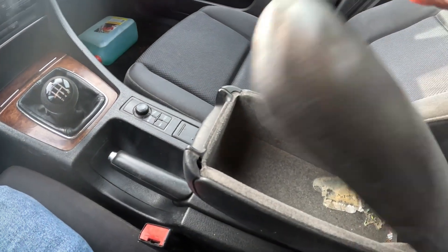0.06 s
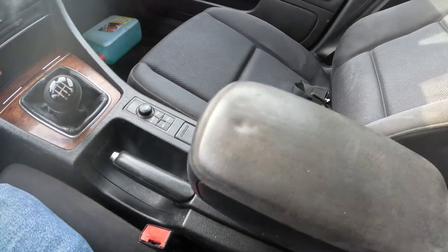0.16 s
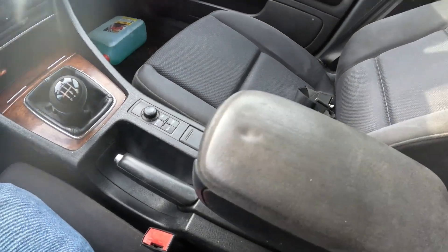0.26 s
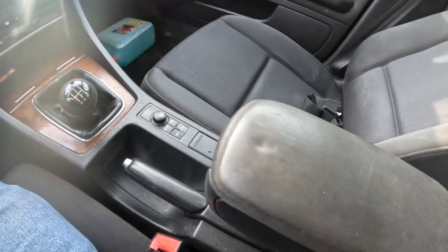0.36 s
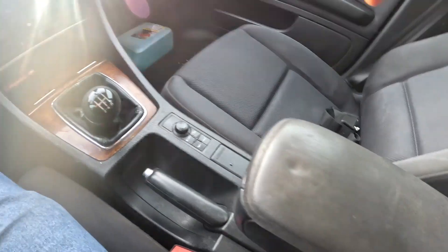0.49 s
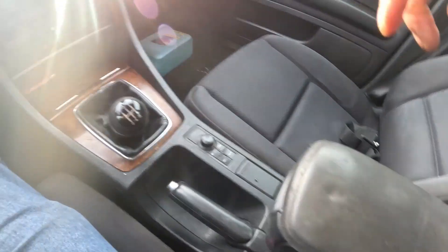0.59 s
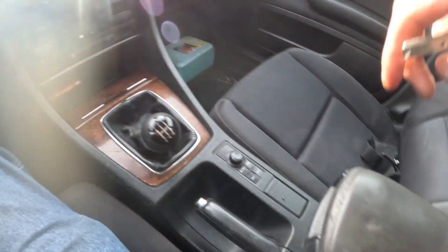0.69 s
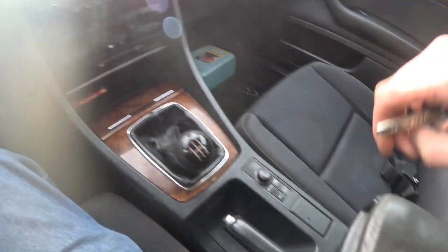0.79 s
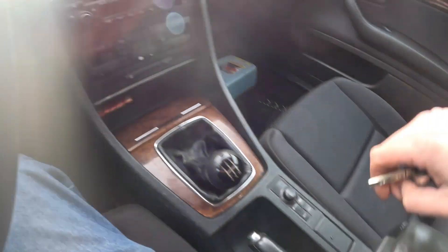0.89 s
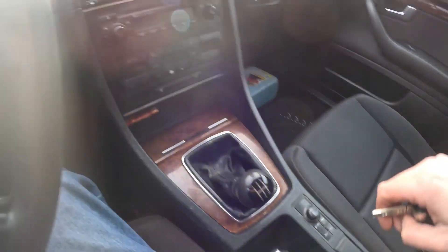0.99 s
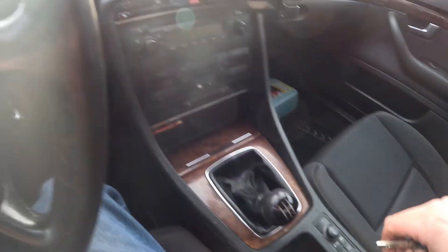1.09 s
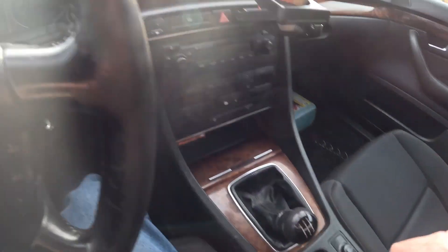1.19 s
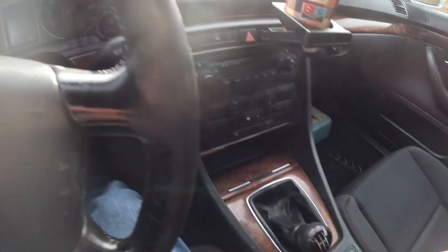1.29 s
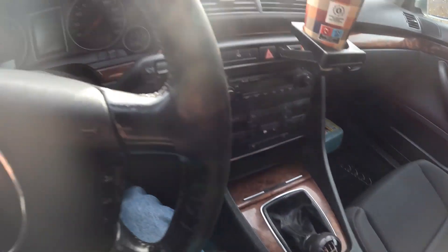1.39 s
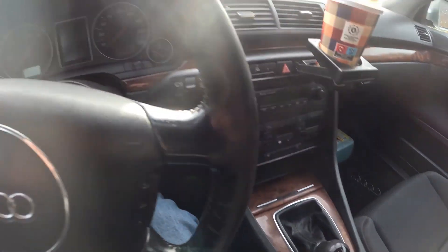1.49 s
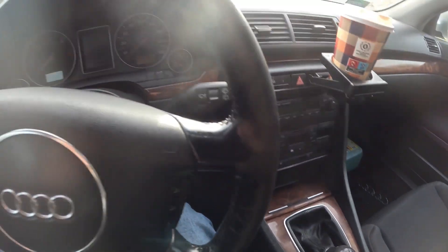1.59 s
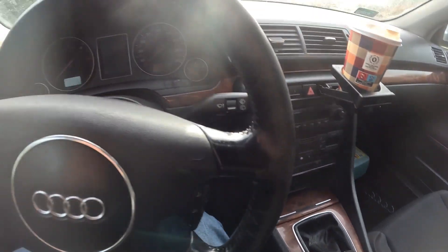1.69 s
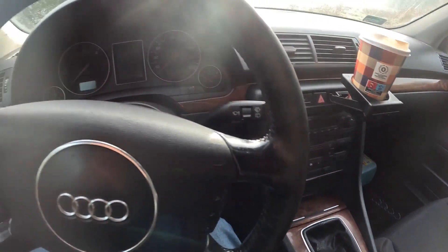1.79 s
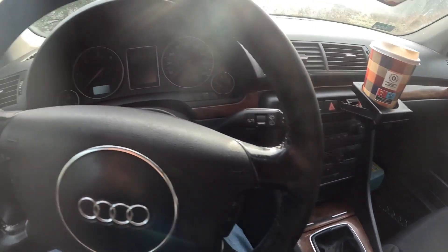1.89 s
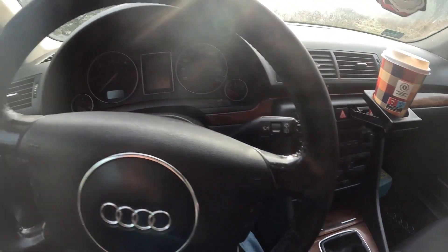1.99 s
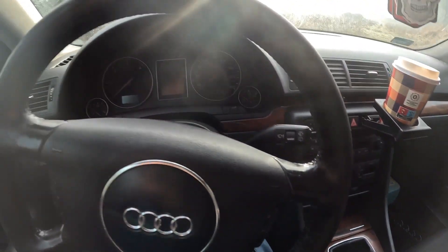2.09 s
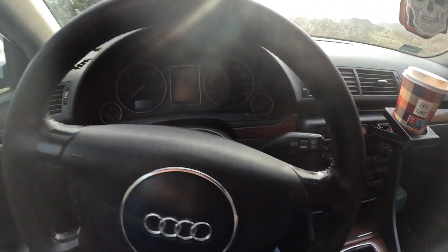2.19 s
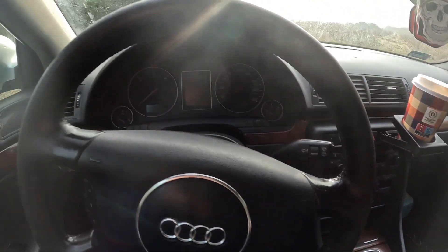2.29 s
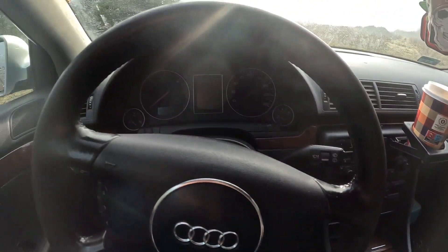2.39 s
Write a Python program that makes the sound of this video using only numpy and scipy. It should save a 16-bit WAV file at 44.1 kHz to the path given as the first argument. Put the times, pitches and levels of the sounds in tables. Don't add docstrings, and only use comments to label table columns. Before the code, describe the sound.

A padded armrest lid bangs shut inside a parked car, with a brief hinge squeak, loose contents rattling and two small bounces; later, soft cloth rustle and metallic key clicks, heard close on a hand-held phone in a dry cabin.

```python
import sys
import numpy as np
from scipy import signal
from scipy.fft import rfft, irfft
from scipy.io import wavfile
from scipy.ndimage import uniform_filter1d

SR = 44100
rng = np.random.default_rng(int(sys.argv[2]) if len(sys.argv) > 2 else 0)


def put_to_file(sound):
    columns = np.atleast_2d(sound).T
    safe = np.clip(columns, -1, 1)
    whole_steps = np.round(safe * 32767)
    wavfile.write(sys.argv[1], SR, whole_steps.astype(np.int16))


def linear_from_db(decibels):
    return 10 ** (np.asarray(decibels, float) / 20)


N = 105840

# (time [s], level [dB], contact [ms], box level [dB], boom level [dB])
LID_CONTACTS = [(0.166, -43, 1.4, -7, -4.5), (0.181, -35.5, 1.3, -7.5, -8.5), (0.1872, -28.5, 1.1, -3, 5.5),
                (0.1965, -16.5, 2.6, -4, 2), (0.2, -23.5, 1.6, -3, 0.5), (0.2041, -19, 1.4, -2, -7),
                (0.2062, -20.5, .9, -4, -7), (0.2096, -2.5, 0.33, -8, -8.5), (0.2124, -22, 0.25, 4, -10.5),
                (0.25, -36, 1.82, 0.5, 7.5), (0.262, -40, 1.5, 4, 1.5), (0.2899, -22.5, 0.6, 2.5, 2),
                (0.299, -33.5, .8, 4.5, 4), (0.331, -31, 1.4, 8, 9.5), (.345, -42, 1, 6, 13.5),
                (0.399, -47, 3.6, -29, 14)]
# (freq [Hz], level [dB], t60 [s])
SHELL_MODES = [(662.5, -7.5, 0.013), (849, -3.5, 0.023), (1050, -3, 0.016), (1589, -9, 0.017),
               (1755, -25, 0.067), (2980, 3, 0.0053), (3500, -6.5, 0.012)]
# (freq [Hz], level [dB], t60 [s])
PAD_MODES = [(216, 1.5, .06)]
# (freq [Hz], level [dB], t60 [s])
BOX_MODES = [(241, -4, 0.078), (288.8, -2.5, 0.044), (330, -7.5, 0.019), (390.9, -13.5, 0.062),
             (670, -14, 0.029), (785, -8, 0.019), (900, -12.5, 0.022), (1497, -9, 0.04)]
# (freq [Hz], level [dB], t60 [s])
BOOM_MODES = [(36.8, -14.5, 0.11), (50, -16.5, 0.42), (62.66, -14, .14), (73, -16.5, 0.16),
              (98.34, -26, 0.29), (166, -21.5, .08)]
# (time [s], level [dB], brightness [Hz], t60 [s])
CRACKS = [(0.167, -54, 2530, 0.11), (0.182, -42, 3200, 0.11), (.188, -40.5, 1500, 0.056),
          (0.1983, -31, 2800, 0.054), (.2025, -39, 4464, .03), (0.2094, -10, 8970, 0.018),
          (0.2131, -28.5, 4960, 0.051), (.22, -36.5, 3523, .05), (0.236, -46.5, 4190, 0.028),
          (0.2607, -50, 2507, 0.052), (0.2899, -31.5, 6700, 0.0244), (.298, -45, 5500, 0.029),
          (.311, -50, 3430, 0.081), (0.3324, -40.5, 3360, .035), (0.3459, -45, 4995, 0.028)]
# (freq [Hz], density [dB per Hz])
CRACK_SPECTRUM = [(350, -38), (600, -12), (966, -6.5), (2220, -19.5), (3980, -20.5), (10200, -27),
                  (15500, -61.5)]
# (time [s], level [dB], t60 [s])
JUMPS = [
    (.185, -39, 0.19),
    (.2, -32, .06),
    (.212, -23, .07),
    (.24, -39, 0.07),
    (.259, -45.5, .1),
    (.275, -51.5, .06),
    (.292, -33, 0.077),
    (.312, -38, 0.091),
    (.333, -37, 0.077),
    (.348, -46.5, 0.041),
]
# (freq [Hz], width [Hz], level [dB])
CONTENTS = [(443, 50, 0), (620, 37, -1.5), (784, 76, -3.5), (932.6, 100, -4.5), (1132, 64, -7),
            (1430, 89, -14.5), (1830, 120, -16)]
# (time [s], level [dB], t60 [s])
SHUDDERS = [
    (.188, -30, .15),
    (.26, -36, 0.22),
    (.325, -30, 0.26),
    (.395, -41, 0.16),
]
# (time [s], level [dB], body relative level [dB], brightness [Hz])
TICKS = [(0.0177, -58.5, -0.5, 5430), (0.1078, -48, -7, 2500), (0.7743, -58, 2.5, 5300),
         (1.038, -58.5, 3.5, 3660), (1.0686, -48, -6.5, 7580), (1.0938, -52, -0.5, 6140),
         (1.1733, -54.5, -3, 3430), (1.2732, -35.5, -13.5, 4320), (1.2883, -39.5, -5, 3680),
         (1.3122, -35, -5.5, 3370), (1.3352, -41.5, -2, 3380), (1.3525, -39, -5.5, 3380),
         (1.3729, -39, -3, 3680), (1.4001, -38.5, -4.5, 3640), (1.5136, -37, -9, 3780),
         (1.662, -49.5, -8.5, 3640), (1.898, -51.5, -11.5, 9800), (1.8985, -57.5, -11.5, 3200),
         (0.05, -55.5, -19, 4500), (1.9684, -56, -15, 3825), (2.2627, -36, -19, 5900)]
# (freq [Hz], width [Hz], level [dB])
LOCK = [(2550, 220, -13), (3315, 150, 4), (3680, 140, 4), (4780, 580, -4), (5490, 390, -4.5),
        (6380, 210, -7), (7040, 130, 2), (8840, 420, -21.5)]
# (freq [Hz], width [Hz], level [dB])
HOUSING = [(449, 38, 6), (736, 160, 7), (1050, 62, 1), (1290, 100, 5), (1650, 33, -46)]
# (time [s], length [s], level [dB], pitch [Hz])
CREAKS = [(.03, 0.047, -54, 520), (.08, 0.0089, -56.5, 426), (0.259, 0.015, -35.5, 420),
          (0.291, .01, -35, 770), (0.2899, .008, -36.5, 990), (1.723, 0.027, -56, 232),
          (1.31, 0.018, -52, 240), (1.275, 0.022, -54.5, 424), (1.314, 0.0091, -50.5, 1240),
          (1.36, 0.044, -70, 430), (1.614, 0.015, -56, 1360), (1.612, 0.014, -59.5, 600),
          (1.63, 0.008, -61.5, 330), (1.663, 0.0087, -52.5, 900), (1.713, 0.015, -53, 1374),
          (1.714, 0.0096, -57, 436), (1.733, .014, -59, 900), (1.745, 0.0064, -58, 1497),
          (2.264, 0.0071, -47.5, 657.4), (2.267, 0.0095, -49.5, 1080)]
# (time [s], level [dB])
CLOTH_DB = [(0, -78.5), (.17, -62), (.3, -74), (.98, -70), (1.12, -68.5), (1.25, -61.5), (1.4, -62),
            (1.46, -67), (1.58, -71.5), (1.7, -63.5), (1.79, -63.5), (1.9, -65.5), (1.98, -74.5),
            (2.3, -77.5)]
# (freq [Hz], density [dB per Hz])
CLOTH_SPECTRUM = [(410, -47.5), (700, -15.5), (1230, 3), (2280, -3), (3520, -4), (3950, -5.5),
                  (7700, -10.5), (12200, -24.5), (15000, -41.5)]
# (time [s], level [dB])
SEAT_DB = [(0, -69), (.12, -66.5), (.4, -64.5), (.5, -103), (.72, -77), (.85, -65), (1.05, -64.5),
           (1.35, -73.5), (1.47, -69), (1.75, -76), (2.4, -82.5)]
# (freq [Hz], density [dB per Hz])
SEAT_SPECTRUM = [(76, -34.5), (130, -3.5), (205, -4.5), (391, -8.5), (900, -23), (1170, -55), (1980, -120)]
# (time [s], level [dB])
GRIP_DB = [(0, -58.5), (.15, -58.5), (.45, -54.5), (.53, -51), (.78, -62), (1.06, -53.5), (1.11, -59),
           (1.15, -46.5), (1.2, -59), (1.3, -48), (1.42, -56.5), (1.49, -76), (1.56, -54.5), (1.66, -60.5),
           (1.76, -51), (1.87, -58), (1.94, -60.5), (2.4, -58)]
# (freq [Hz], density [dB per Hz])
GRIP_SPECTRUM = [(7.1, -32), (12, 7.5), (49, 1.5), (81, -8), (200, -24.5), (260, -45.5), (440, -120)]
# (freq [Hz], density [dB per Hz])
HISS_SPECTRUM = [(88, -35), (150, -0.5), (500, -15.5), (656, -15), (844, -24.5), (1220, -9), (2100, -22),
                 (6110, -23.5), (15500, -29.5)]
# (freq [Hz], left lead [rad])
PORT_RAD = [(0, 0), (300, .1), (700, .3), (1200, -.3), (1900, -.9), (2500, -.4), (3900, -1.0), (4700, -.3),
            (16000, -1)]
# (freq [Hz], left minus right [dB])
PORT_DB = [(50, -1), (380, -1.1), (700, -2.5), (1300, -1.3), (2400, 1.5), (4400, 1.5), (8000, 3),
           (15000, .5)]

TIME_S = np.arange(N) / SR
SHORT_S = np.arange(4096) / SR
LEFT_RIGHT = np.array([[.5], [-.5]])


def colour(x, points):
    p = np.array(points)
    f = np.arange(x.shape[-1] // 2 + 1) * SR / x.shape[-1] + 1
    gain = linear_from_db(np.interp(np.log(f), np.log(p[:, 0]), p[:, 1]))
    y = irfft(rfft(x) * gain, x.shape[-1])
    return y / np.sqrt(np.mean(y ** 2))


def curve(points):
    p = np.array(points)
    return linear_from_db(np.interp(TIME_S, p[:, 0], p[:, 1]))


def walk(rate_hz):
    k = int(SR / rate_hz)
    w = uniform_filter1d(uniform_filter1d(rng.standard_normal(N), k), k)
    return w / w.std()


def fall(t, t60_s):
    return (t >= 0) * linear_from_db(-60 * np.maximum(t, 0) / t60_s)


def bursts(table):
    return sum(linear_from_db(db) * fall(TIME_S - s, t60_s) for s, db, t60_s in table)


def add(out, at_s, x):
    i = int(at_s * SR)
    out[i:i + len(x)] += x[:N - i]


def highpass(x, hz, order):
    return signal.lfilter(*signal.butter(order, hz, "high", fs=SR), x)


def ring(x, modes):
    y = 0
    for hz, db, t60_s in modes:
        pole = np.exp(2j * np.pi * hz / SR - np.log(1000) / (t60_s * SR))
        y = y + linear_from_db(db) * signal.lfilter([1], [1, -pole], x)
    return y


def peaks(x, table, trim_db=0):
    y = 0
    for (hz, width_hz, db), trim in zip(table, np.broadcast_to(trim_db, len(table))):
        y = y + linear_from_db(db + trim) * signal.lfilter(*signal.iirpeak(hz, hz / width_hz, SR), x)
    return y


def shove(t, ms):
    return np.sin(np.pi * np.clip(t * 1000 / ms, 0, 1)) ** 2 * 2000 / (ms * SR)


def lid_body():
    squash_lag_ms, squash_ms = 2.05, 1.1
    push, pad, box, boom = 0, 0, 0, 0
    for s, db, contact_ms, box_db, boom_db in LID_CONTACTS:
        squash = linear_from_db(db) * shove(TIME_S - s - squash_lag_ms / 1000, squash_ms)
        push = push + linear_from_db(db) * shove(TIME_S - s, contact_ms)
        pad = pad + squash
        box = box + linear_from_db(box_db) * squash
        boom = boom + linear_from_db(boom_db) * squash
    swing = ring(pad, PAD_MODES) + ring(box, BOX_MODES)
    lid = highpass(ring(push, SHELL_MODES).real + swing.imag, 170, 2)
    return lid + highpass(ring(boom, BOOM_MODES).imag, 28, 2)


def cracks():
    out, noise = np.zeros(N), colour(rng.standard_normal(N), CRACK_SPECTRUM)
    for s, db, hz, t60_s in CRACKS:
        attack = np.minimum(SHORT_S * 2000, 1)
        x = noise[int(s * SR):][:len(SHORT_S)] * fall(SHORT_S, t60_s) * attack
        add(out, s, linear_from_db(db) * signal.lfilter(*signal.butter(2, min(hz, 18000), fs=SR), x))
    return out


def rattle():
    knocks = rng.standard_normal(N) ** 2 * rng.standard_normal(N)
    return peaks(peaks(bursts(JUMPS) * knocks, CONTENTS), [(800, 530, 6.9)])


def shudder():
    mount = [(48.5, 48, 12)]
    return peaks(peaks(bursts(SHUDDERS) * rng.standard_normal(N), mount), mount)


def squeak():
    start_s, length_s, hz, level_db, rise_db = .186, .026, 7930, -27, 14.5
    u = np.clip((TIME_S - start_s) / length_s, 0, 1)
    tone = np.sin(2 * np.pi * hz * TIME_S + 0.68 * walk(900))
    window = np.sqrt(np.abs(np.sin(np.pi * u)))
    return tone * window * linear_from_db(2.0 * walk(400)) * linear_from_db(level_db + rise_db * (u - 2.5))


def ticks():
    hold_s, metal_t60_s, body_t60_s = 0.00032, 0.042, 0.0424
    metal_trim_db, body_trim_db, scatter_db = -9.5, -8.5, 2
    out, t = np.zeros(N), SHORT_S
    for s, db, body_db, hz in TICKS:
        noise, knock, spikes = rng.standard_normal((3, len(t)))
        envelope = fall(np.maximum(t - hold_s, 0), metal_t60_s) * np.minimum(t * 1000, 1)
        chatter = noise * linear_from_db(1.3 * np.abs(spikes)) * envelope
        near_db = [-3.0 * np.log2(f / hz) ** 2 + scatter_db * rng.standard_normal() for f, _, _ in LOCK]
        metal = peaks(chatter, LOCK, near_db) + peaks(chatter, [(hz, hz * 0.2, -9)])
        body_scatter_db = scatter_db * rng.standard_normal(len(HOUSING))
        body = peaks(knock * fall(t - .001, body_t60_s), HOUSING, body_scatter_db)
        add(out, s, linear_from_db(db + metal_trim_db) * metal / metal[:256].std())
        add(out, s, linear_from_db(db + body_db + body_trim_db) * body / body[:256].std())
    return out


def scrape():
    start_s, length_s, level_db, centre_hz = 1.72, .215, -62, 3120
    u = np.clip((TIME_S - start_s) / length_s, 0, 1)
    near_db = [-6.0 * np.log2(f / centre_hz) ** 2 for f, _, _ in LOCK]
    drag = peaks(rng.standard_normal(N) * linear_from_db(4.2 * walk(71)), LOCK, near_db)
    return linear_from_db(level_db) * drag / drag.std() * np.sqrt(np.abs(np.sin(np.pi * u ** 2)))


def creaks():
    out, t = np.zeros(N), SHORT_S
    for s, length_s, db, hz in CREAKS:
        jerks = linear_from_db(5.7 * np.abs(rng.standard_normal(len(t))))
        slip = rng.standard_normal(len(t)) * jerks * fall(np.maximum(t - length_s, 0), 0.038)
        x = peaks(slip, [(hz, hz * 0.18, 0), (hz * 2.4, hz * .5, -10)])
        x = peaks(x, [(hz, hz, 0)])
        add(out, s, linear_from_db(db - 6) * x / x[:int(length_s * SR)].std())
    return out


def rubbing():
    grains_per_s, grain_db = 400, 4.5
    chance, size = rng.random((2, N))
    grains = (chance < grains_per_s / SR) * linear_from_db(-grain_db * np.log(size + 1e-9)) * rng.standard_normal(N)
    cloth = colour(grains + 0.96 * rng.standard_normal(N), CLOTH_SPECTRUM)
    cloth = cloth * curve(CLOTH_DB) * linear_from_db(1.5 * walk(30))
    upholstery = colour(rng.standard_normal(N), SEAT_SPECTRUM)
    return cloth + upholstery * curve(SEAT_DB) * linear_from_db(0.87 * walk(18))


def cabin(x):
    t60_s, level_db, low_hz, spread_db, spread_hz = 0.06, -7, 515.2, 1, 900
    t = np.arange(8192) / SR
    noise = rng.standard_normal((2, len(t))) * fall(t - .0015, t60_s)
    mid, side = highpass(noise, low_hz, 1)
    tail = mid + linear_from_db(spread_db) * highpass(side, spread_hz, 1) * np.array([[1], [-1]])
    tail = linear_from_db(level_db) * tail / np.sqrt(np.mean(np.sum(tail ** 2, axis=1)))
    return signal.fftconvolve(x[None], tail, axes=1)[:, :N]


def grip():
    return colour(rng.standard_normal(N), GRIP_SPECTRUM) * curve(GRIP_DB) * linear_from_db(1.7 * LEFT_RIGHT)


def hiss():
    level_db, rise_db_per_s = -71, 0.44
    noise = rng.standard_normal((3, N))
    noise = colour(noise[:2] + .8 * noise[2], HISS_SPECTRUM)
    return noise * linear_from_db(level_db + rise_db_per_s * TIME_S + walk(4.6))


def scene():
    lid_cabin_db, key_left_db = -7, -0.5
    lid = lid_body() + cracks() + rattle() + shudder() + squeak()
    key = ticks() + scrape()
    seat = creaks() + rubbing()
    near = lid + seat + key * linear_from_db(key_left_db * LEFT_RIGHT)
    return near + cabin(linear_from_db(lid_cabin_db) * lid + seat + key) + grip() + hiss()


def roll_off(x):
    return signal.sosfilt(signal.butter(12, 16470, fs=SR, output="sos"), x)


def record(dry):
    top_hz = 11300
    f = np.arange(N // 2 + 1) * SR / N
    phase, balance = np.array(PORT_RAD), np.array(PORT_DB)
    lead_rad = np.interp(f, phase[:, 0], phase[:, 1])
    left_db = np.interp(np.log(f + 1), np.log(balance[:, 0]), balance[:, 1])
    ports = np.exp(1j * LEFT_RIGHT * lead_rad) * linear_from_db(left_db * LEFT_RIGHT) / (1 + (f / top_hz) ** 6)
    mix = np.clip(irfft(rfft(dry) * ports, N), -1, 1)
    return roll_off(mix)


dry = scene()
out = record(dry)
put_to_file(out)
```